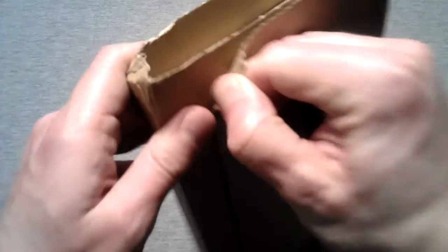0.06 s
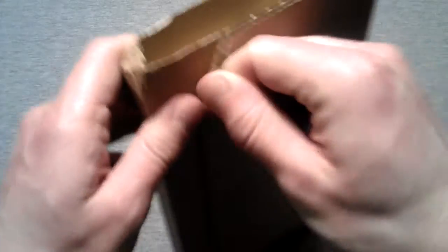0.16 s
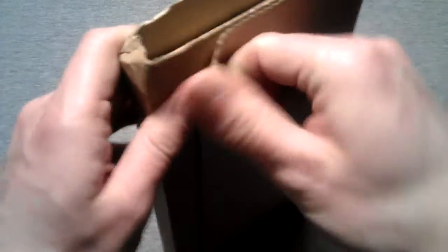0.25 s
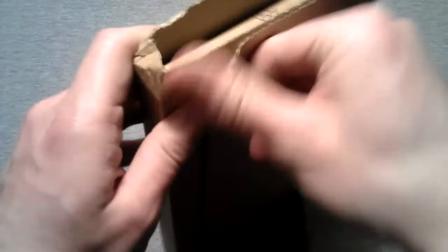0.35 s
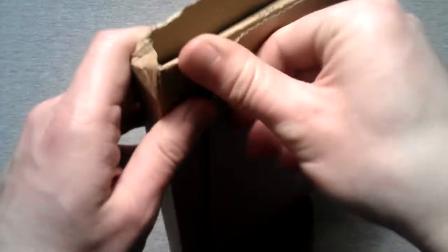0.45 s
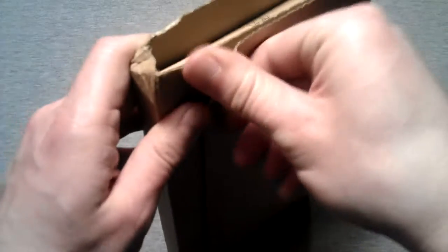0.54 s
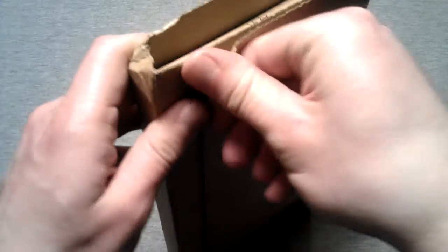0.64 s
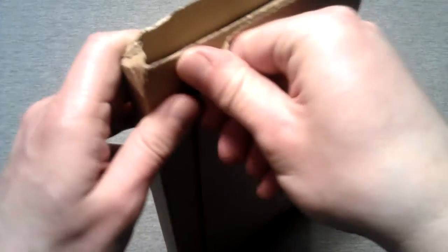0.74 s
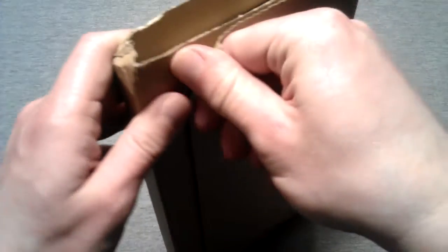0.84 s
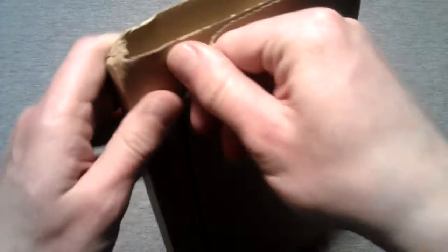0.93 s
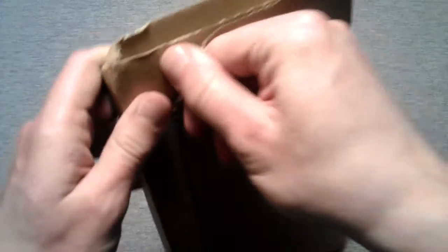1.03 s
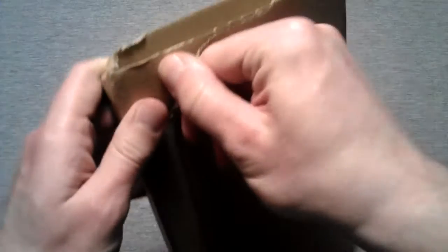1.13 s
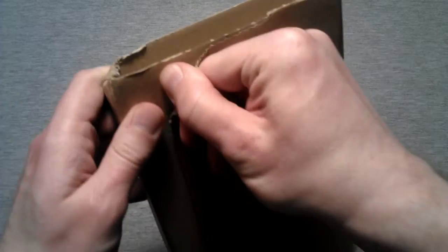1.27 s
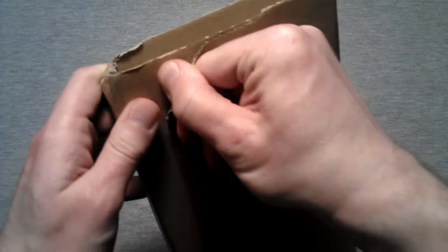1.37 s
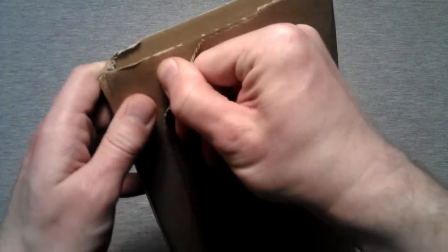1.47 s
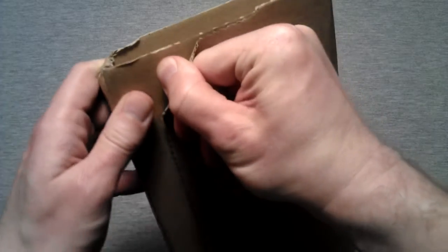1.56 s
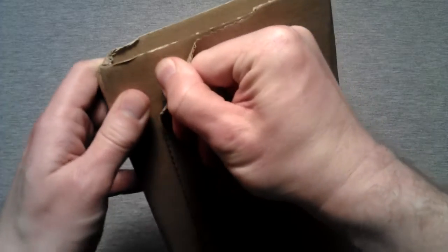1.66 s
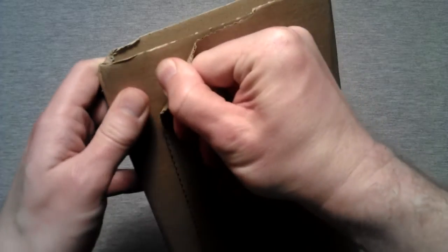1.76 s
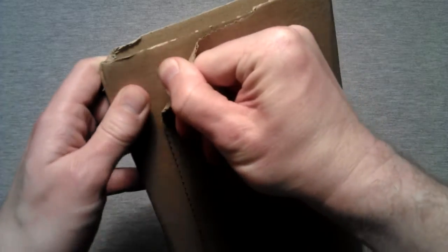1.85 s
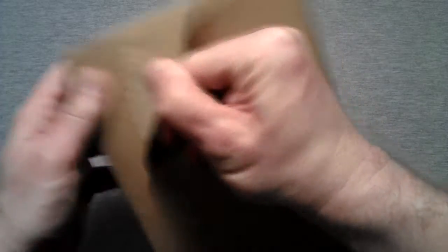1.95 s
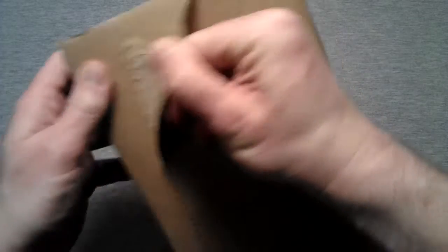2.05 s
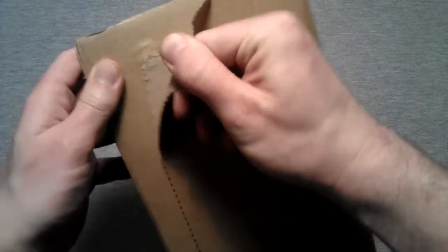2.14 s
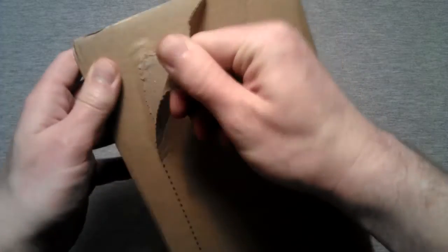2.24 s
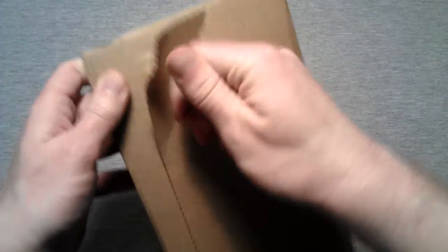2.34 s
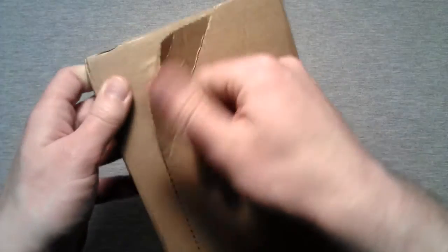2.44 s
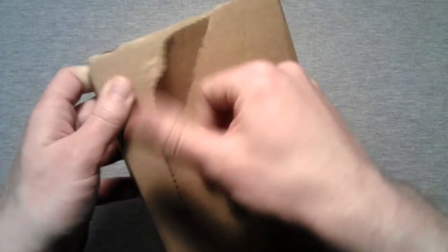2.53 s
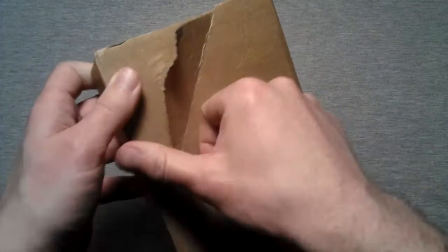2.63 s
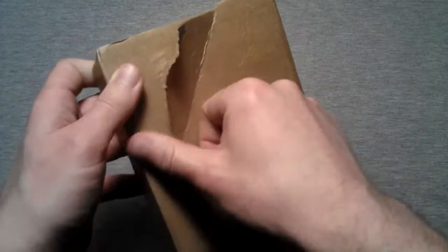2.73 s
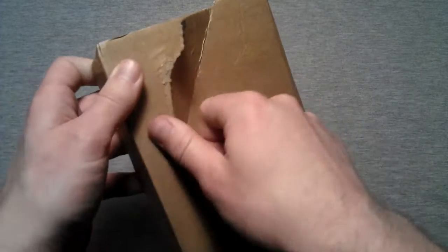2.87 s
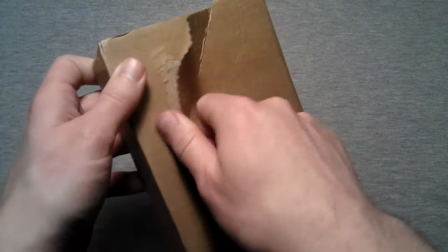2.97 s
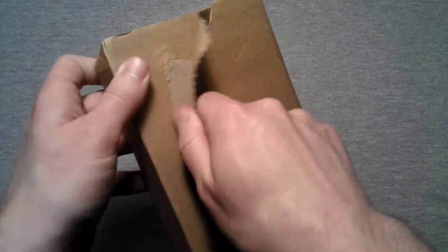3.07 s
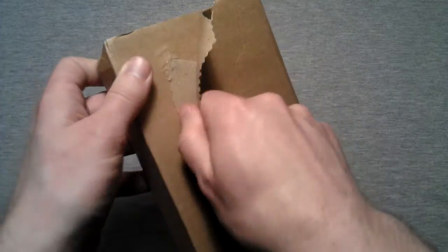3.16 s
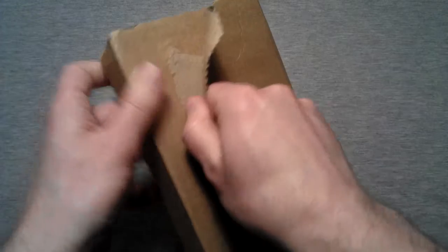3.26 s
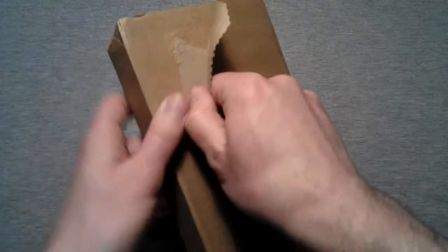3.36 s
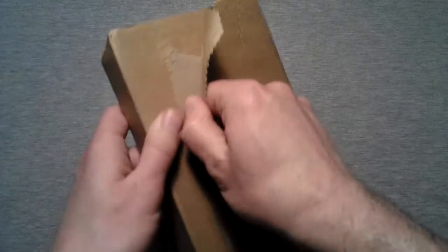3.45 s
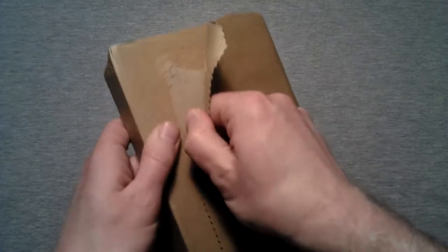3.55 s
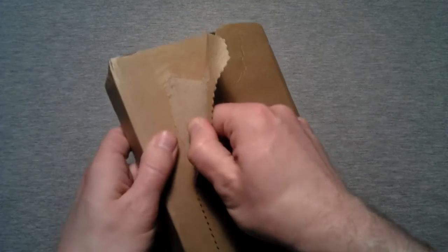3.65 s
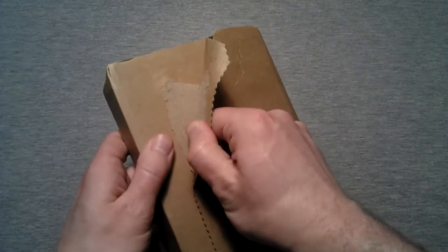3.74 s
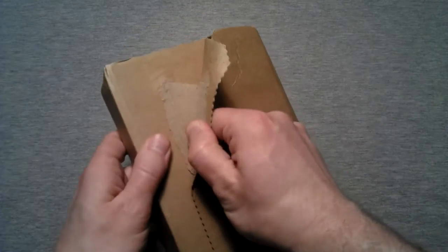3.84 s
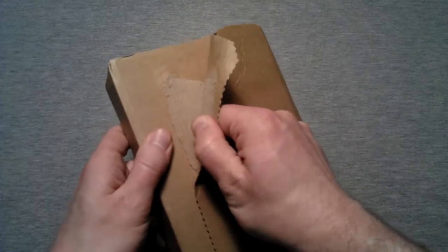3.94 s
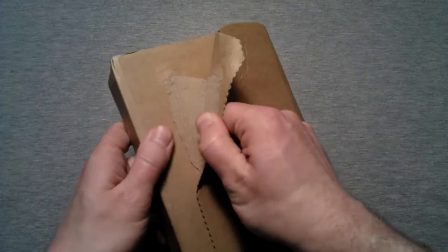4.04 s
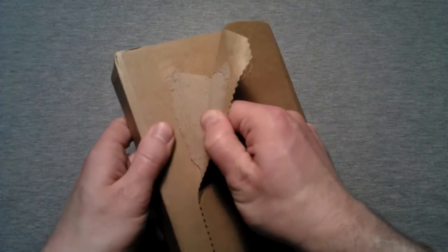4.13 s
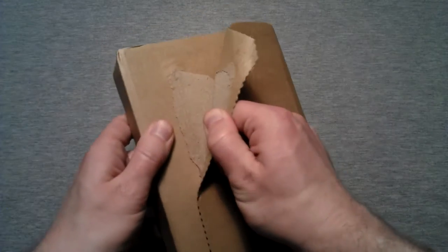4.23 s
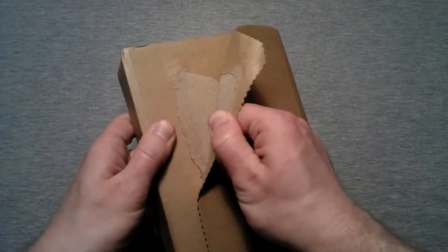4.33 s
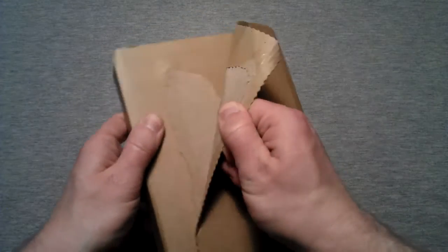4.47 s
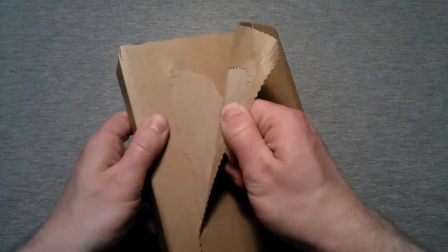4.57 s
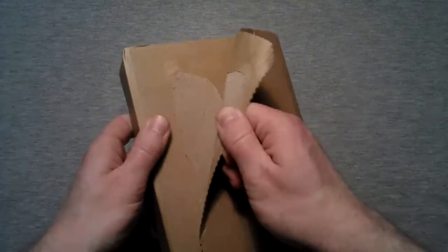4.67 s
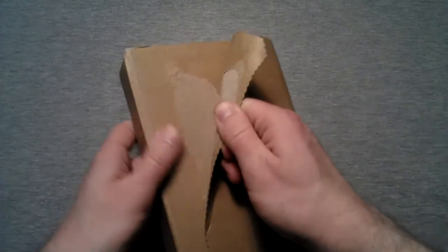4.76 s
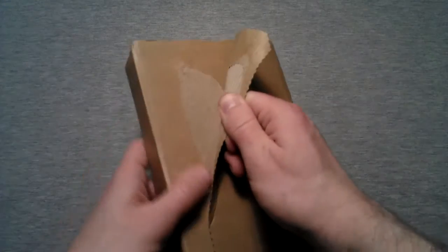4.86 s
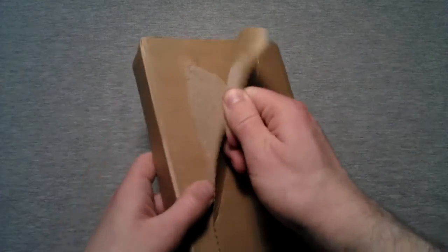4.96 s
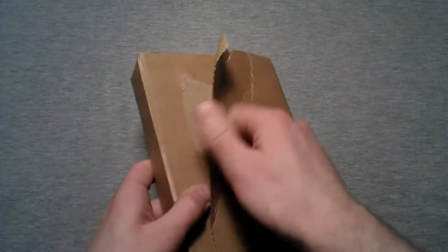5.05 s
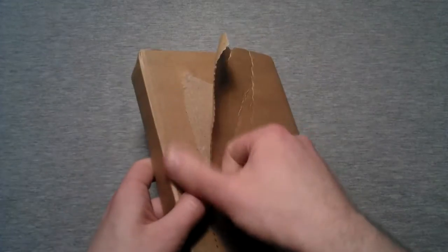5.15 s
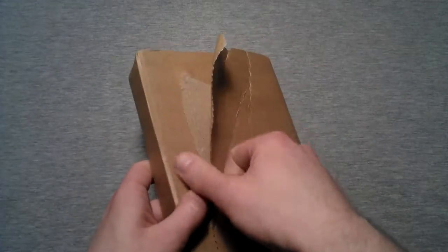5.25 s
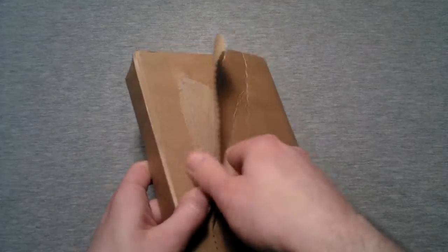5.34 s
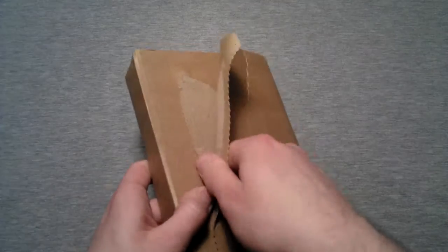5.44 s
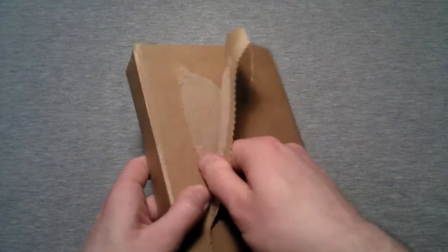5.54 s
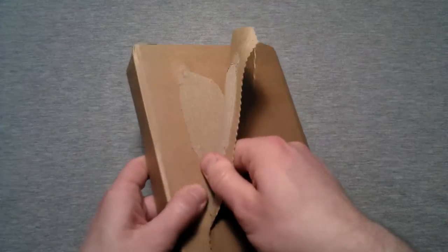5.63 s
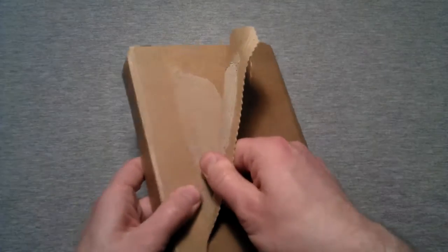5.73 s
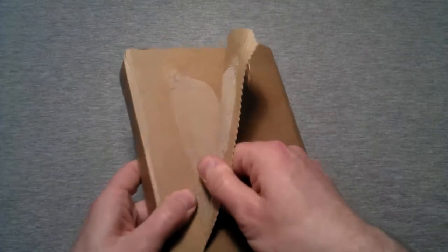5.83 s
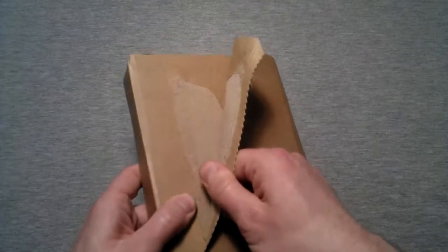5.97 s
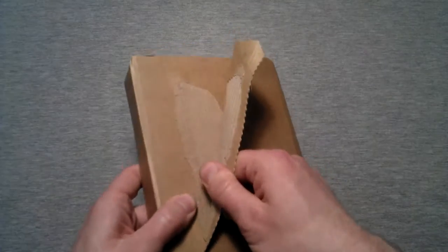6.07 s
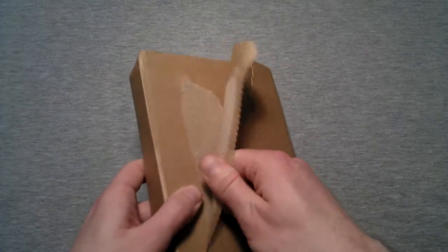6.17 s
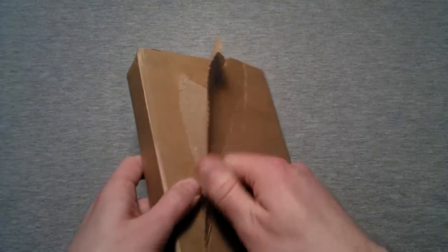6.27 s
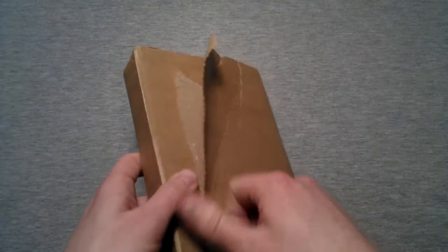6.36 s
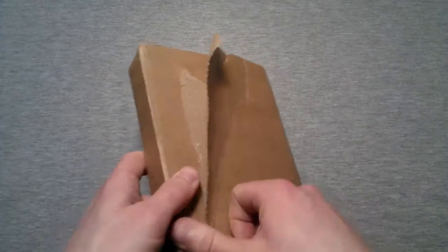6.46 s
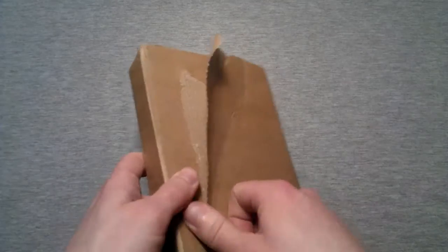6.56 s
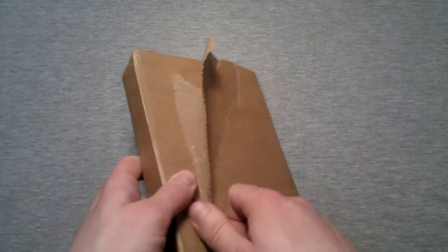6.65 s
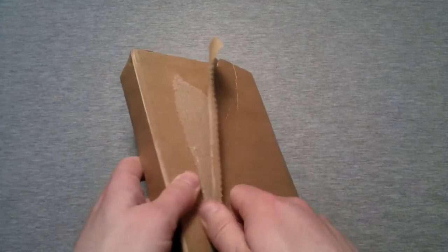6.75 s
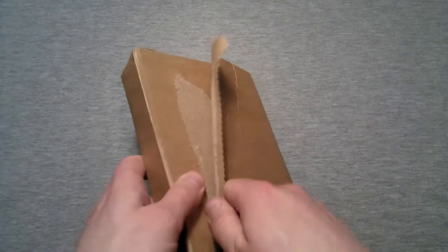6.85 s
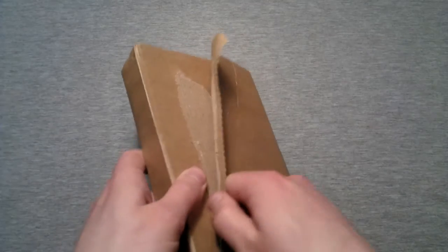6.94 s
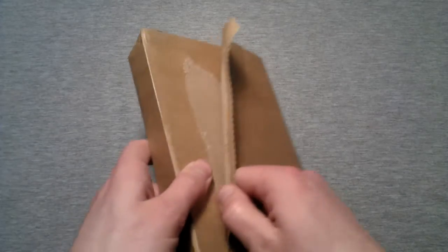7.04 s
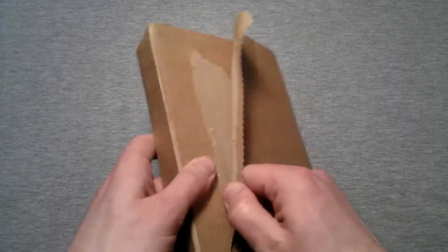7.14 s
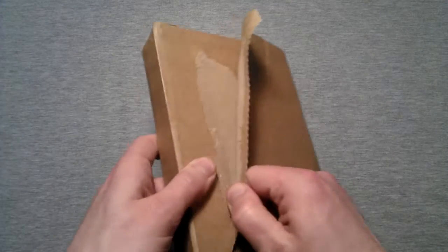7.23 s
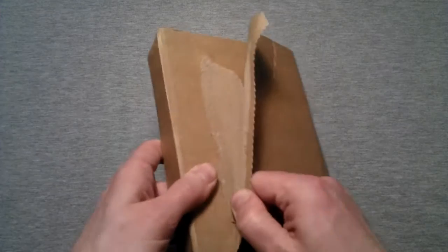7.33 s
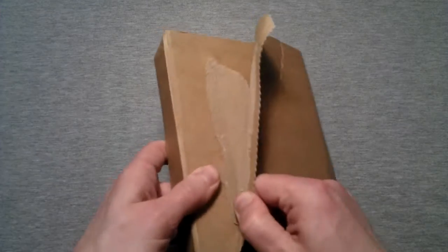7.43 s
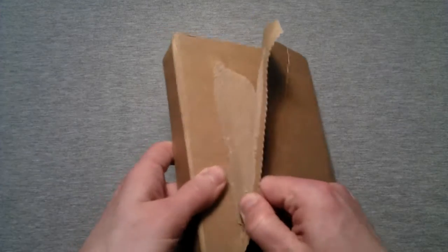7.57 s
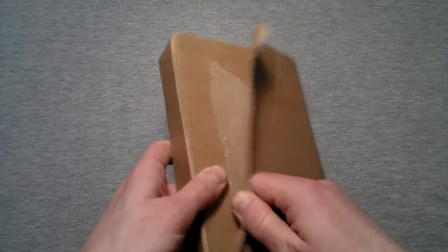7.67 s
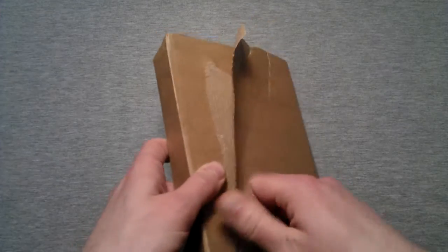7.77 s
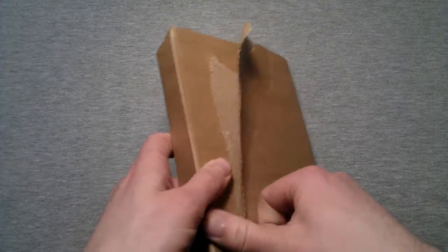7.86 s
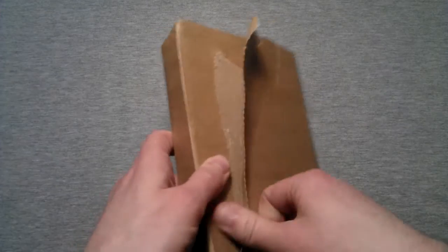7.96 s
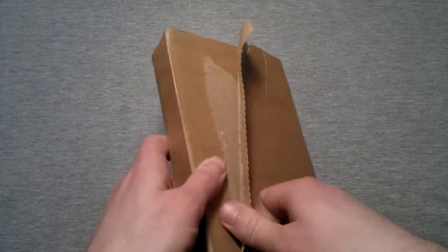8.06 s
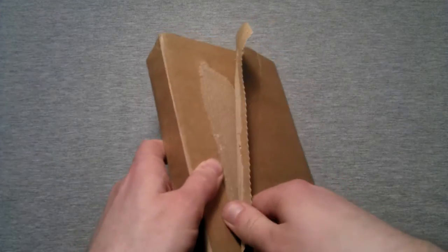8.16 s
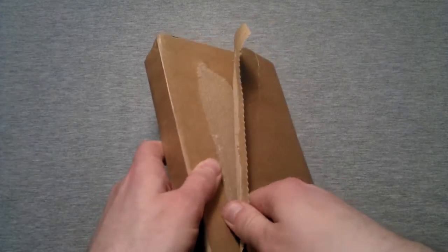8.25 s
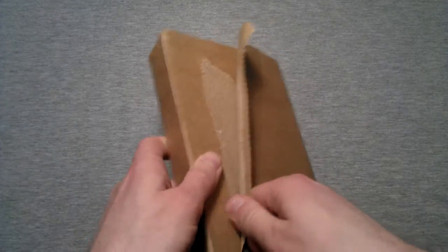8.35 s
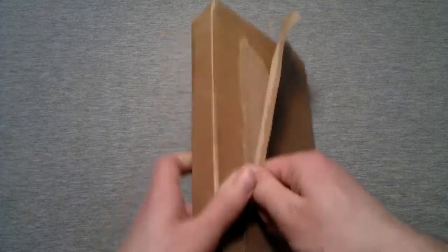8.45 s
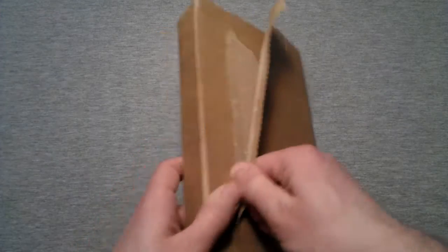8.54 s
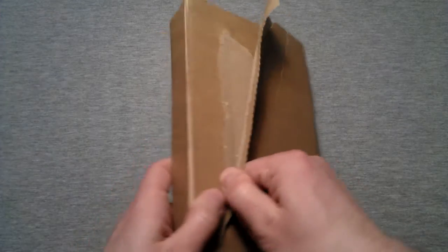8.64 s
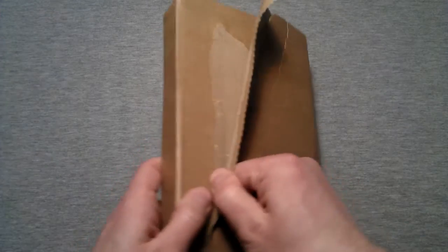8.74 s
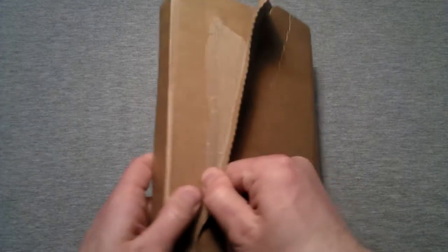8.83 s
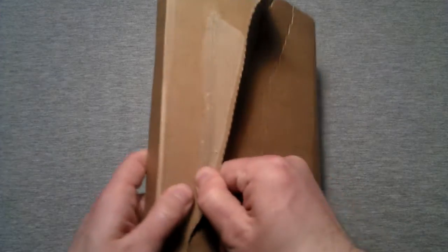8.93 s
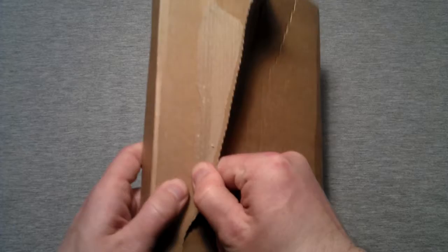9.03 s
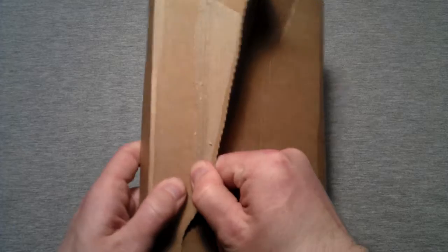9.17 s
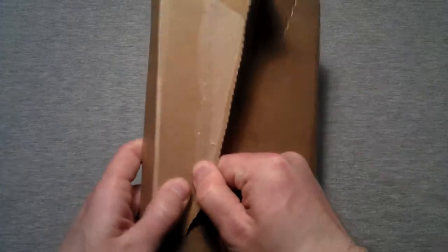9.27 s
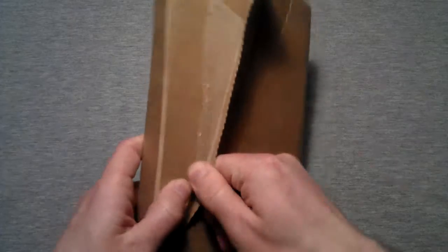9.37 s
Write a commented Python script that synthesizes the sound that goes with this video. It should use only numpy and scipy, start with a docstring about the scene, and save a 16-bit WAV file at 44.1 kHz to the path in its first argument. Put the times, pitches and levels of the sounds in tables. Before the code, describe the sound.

Close to a small microphone in a quiet furnished room, hands hold a corrugated cardboard parcel over a faint hush. Tiny ticks and soft skin rustle come first; from 0.8 to 1.45 s a thumb judders over the panel in rapid dull chirps, slowing, then quickening. After one tick at 1.6 s, a violent short rip at 2.0 s booms through the box, with a knock and a stiff pop at 2.3 s. Quiet fumbling follows until crackles and a snap around 3.65 s. From 4.03 to 4.55 s comes the longest tear: dense bright snaps, thumps and a final fast rip, slightly saturated. A taut creak and sharp pop sound near 5.05 s, brief cracks at 5.83 s, a squeaky creak at 6.3 s. Light slips lead into tearing at 7.15-7.6 s, a scrape at 7.8 s, juddering strip slips at 8.2-8.8 s, and last crackling snaps at 8.95-9.15 s, then soft handling.

```python
"""A small, quiet furnished room: two hands open a corrugated cardboard mailer close to a small microphone.
They slide over the liner and a thumb judders over the panel, each slip a falling chirp; then the tear
strip is pulled in stages. Fibres crackle as random grains, perforation bridges snap and thump the box,
slips make the strip creak, rips are dense noise. The loudest peaks saturate the microphone."""
import sys
import numpy as np
from scipy import signal
from scipy.fft import rfft, irfft
from scipy.io import wavfile
from scipy.ndimage import map_coordinates

SR = 44100
rng = np.random.default_rng(int(sys.argv[2]) if len(sys.argv) > 2 else 0)


def int16_out(signal):
    """Quantize to a 16-bit WAV file."""
    q = np.round(np.clip(np.atleast_2d(signal).T, -1, 1) * 32767)
    wavfile.write(sys.argv[1], SR, q.astype(np.int16))


N = 414540
TIME = np.arange(N) / SR
TOP_HZ = 16000  # upper limit of the microphone

# fast rips, where the tear runs free: (time [s], length [s], level [dB], box boom [dB])
RIP_TIMES = [(1.992, 0.027, -6, -8.5), (2.031, 0.033, -6, -17), (4.489, 0.03, -10, -22.5),
             (4.517, 0.028, -6, -36), (5.047, 0.016, -22, -45), (5.825, 0.017, -17.5, -38),
             (5.862, 0.014, -11.5, -50.5), (6.328, 0.012, -24.5, -27), (7.35, 0.0063, -17, -19)]
# what a snapping bridge or bundle radiates: (frequency [Hz], level [dB])
SNAP_SPECTRUM = [(100, -40), (400, -11.5), (900, 4), (1600, 15), (3000, 10.5), (4800, 10.5), (8000, 2),
                 (11500, 0.5), (16000, -25.5)]
# thin bridges and bundles tick brighter than thick ones: (crack peak [dB], treble tilt [dB per octave])
THINNESS_TILT = [(-18.5, 4.4), (3.5, 0.71)]
BRIGHT_HZ = 4030  # that tilt acts above this
# what the wide panel radiates: (frequency [Hz], level [dB])
PANEL_SPECTRUM = [(120, -50), (210, -31.5), (330, 1.5), (570, 3.5), (950, -2), (1600, 1), (2300, -3),
                  (3500, 1), (6000, -3), (10000, -16.5), (16000, -54.5)]
# what the narrow tear strip radiates at tension 1: (frequency [Hz], level [dB])
STRIP_SPECTRUM = [(120, -43), (350, -5.5), (700, -1.5), (1020, -2), (1310, 10.5), (1570, 5), (1880, 11),
                  (2400, -1), (3200, -6), (5000, -13.5), (8000, -29.5), (16000, -53.5)]
# what skin sliding on the liner radiates: (frequency [Hz], level [dB])
SKIN_SPECTRUM = [(120, -37), (350, -20.5), (900, -6), (1700, 6), (2600, 3.5), (4500, 3.5), (6000, -5),
                 (9000, -19.5), (16000, -39)]
# what the whole box radiates: (frequency [Hz], level [dB])
BOX_SPECTRUM = [(25, -31.5), (90, -18), (170, -4), (270, 4.5), (420, 2), (700, -0.5), (1500, -11),
                (6000, -59)]
SOFT_HZ = 1320  # the softness of the contact tilts the treble above this


def undb(db):
    """Decibels to gain."""
    return 10 ** (np.asarray(db) / 20)


def unit(x):
    """Scale to rms 1."""
    return x / np.sqrt(np.mean(x ** 2))


def add(track, s, sound):
    """Mix a sound into a track at a time in seconds."""
    i = max(int(s * SR), 0)
    track[i:i + len(sound)] += sound[:N - i]


def through(x, response):
    """Pass a sound through an impulse response."""
    return signal.fftconvolve(x, response)[:len(x)]


def tilted(points, db_per_octave, corner_hz):
    """A spectrum with its treble tilted above a corner."""
    return [(hz, db + db_per_octave * np.log2(max(hz / corner_hz, 1))) for hz, db in points]


def board(points, lag_s=0, size=2048):
    """Causal response of a spectrum; bending waves are dispersive, so the bass comes later than the treble."""
    f = np.arange(size // 2 + 1) * SR / size
    hz, db = np.transpose(points)
    gain = undb(np.interp(np.log(f + 1), np.log(hz), db))
    # folding the cepstrum gives minimum phase
    cepstrum = irfft(np.log(gain))
    cepstrum[1:size // 2] *= 2
    cepstrum[size // 2 + 1:] = 0
    # delay of f: lag_s * (sqrt(1000 / f) - sqrt(1000 / TOP_HZ))
    turns = lag_s * (2 * np.sqrt(1000 * f) - f * np.sqrt(1000 / TOP_HZ))
    return irfft(np.exp(rfft(cepstrum) - 2j * np.pi * turns))


def walk(rate):
    """Random wander through rate random values a second, with a spread near 1."""
    knots = rng.standard_normal(N // 20)
    return np.interp(TIME * rate, np.arange(len(knots)), knots)


def grains(rate, spread_db):
    """Random clicks, rate a second, scaled to rms 1: many small, a few large."""
    chance, size, sign = rng.random(N), rng.exponential(size=N), rng.choice([-1, 1], N)
    clicks = (chance < rate / SR) * sign * undb(spread_db * np.minimum(size, 3))
    return unit(clicks / np.sqrt(rate))  # even power where the rate varies


def blow(response, path, scatter, ring_s):
    """One click, followed by its scattering among flutes and edges; peak 1."""
    fading = np.exp(-TIME[:len(path)] / ring_s)
    force = scatter * path * fading / np.sqrt(ring_s * SR / 2)
    force[0] += 1
    sound = through(force, response)
    return sound / np.abs(sound).max()


def paths(rows, hold_s, size=3072):
    """A scattering pattern for each event; it changes only as the contact moves, over about hold_s."""
    out = rng.standard_normal((len(rows), size))
    for k in range(1, len(rows)):
        alike = np.exp(-abs(rows[k][0] - rows[k - 1][0]) / hold_s)
        out[k] = alike * out[k - 1] + np.sqrt(1 - alike ** 2) * out[k]
    return out


def scattered(response, count, scatter, ring_s):
    """Responses from several spots on the board, each with its own colour and the same energy."""
    spots = [blow(response, rng.standard_normal(2048), scatter, ring_s) for _ in range(count)]
    return [unit(spot) for spot in spots]


def strokes(rows, rise_s, fall_s, swell=0):
    """Envelope of short pulls (s, length, dB) that build up, hold and run out; swell slows the long ones."""
    out, t = np.zeros(N), TIME[:SR // 2]
    for s, length, db in rows:
        rise = 1 - np.exp(-t / (rise_s + swell * length))
        fall = np.exp(-np.maximum(t - length, 0) / fall_s)
        add(out, s, undb(db) * rise * fall)
    return out


def stick_slip(curve):
    """Skin sticks and lets go, a little unevenly, at the rate of a curve (s, slips per s, dB, ..)."""
    jitter_s, scatter_db = .0005, 1.5
    times, rates, levels, *others = np.transpose(curve)
    rows, s = [], times[0]
    for late, louder in rng.standard_normal((64, 2)):  # at most 64 slips
        if s < times[-1]:
            db = np.interp(s, times, levels) + scatter_db * louder
            rows.append((s + jitter_s * late, db, *(np.interp(s, times, column) for column in others)))
            s += 1 / np.interp(s, times, rates)
    return rows


def pull():
    """Strength of the slow tearing through time, as a gain."""
    # one curve for each pull: (time [s], fibre crackle [dB])
    pull_curves = [
        [(1.35, -48.5), (1.66, -54.5), (1.81, -50.5), (1.87, -60.5), (1.979, -39.5), (1.99, -13)],
        [(3.6, -50.5), (3.67, -41), (3.695, -32), (3.725, -48.5), (3.82, -53.5)],
        [(4.022, -52), (4.055, -32.5), (4.15, -23.5), (4.235, -36.5), (4.255, -24), (4.36, -33), (4.43, -36.5),
         (4.49, -21)],
        [(5.68, -59), (5.812, -45.5), (5.825, -22), (5.88, -41), (5.96, -55), (6.01, -46), (6.06, -55)],
        [(7.17, -29.5), (7.27, -35), (7.3, -27), (7.4, -27.5), (7.44, -50), (7.6, -44.5), (7.7, -59)],
        [(8.945, -50), (8.965, -33.5), (9.05, -39.5), (9.11, -31), (9.14, -30), (9.2, -47.5), (9.27, -73)],
    ]
    force = np.zeros(N)
    for curve in pull_curves:
        times, levels = np.transpose(curve)
        force += np.interp(TIME, times, undb(levels), left=0, right=0)
    return force


def background(sound, loud_db=-11, depth_db=8, recover_s=0.1):
    """The hush of the room and a faint rustle of the grip; both dip at a loud sound and then come back."""
    # hush of the room: (frequency [Hz], level [dB])
    air_spectrum = [(30, -42), (75, -37.5), (160, -25), (290, -9), (600, -8.5), (1100, -14.5),
                    (1700, -13.5), (3600, -27), (7000, -24.5), (16000, -32)]
    air_db, grip_db, grip_wander_db = -57.5, -61, 3  # the grip: hands that merely hold the parcel
    hush = undb(air_db) * unit(through(rng.standard_normal(N), board(air_spectrum)))
    rustle = unit(through(grains(rate=2600, spread_db=3), board(SKIN_SPECTRUM)))
    grip = undb(grip_db + grip_wander_db * walk(7.2)) * rustle
    # peak level that falls away with time constant recover_s
    fading = TIME / recover_s
    held = np.exp(np.maximum.accumulate(np.log(np.abs(sound) + 1e-9) + fading) - fading)
    dip = held ** 2 / (held ** 2 + undb(loud_db) ** 2)
    return (hush + grip) * undb(-depth_db * dip)


def sliding():
    """Hands, peeling strip and freed flaps slide with a grainy hiss; its colour shifts with the contact."""
    # strokes of the hands over the liner:
    # (time [s], length [s], level [dB], sharp edge hiss against that level [dB])
    hand_strokes = [(0, 0.032, -63, 15), (0.23, 0.012, -46.5, 12.5), (0.457, 0.038, -62.5, 14),
                    (0.615, 0.16, -57, -1.5), (0.793, 0.47, -46, -26), (1.333, 0.091, -54, -15),
                    (1.676, 0.13, -57, 8.5), (2.111, 0.033, -35.5, -26), (2.468, 0.011, -53.5, 4.5),
                    (3.347, 0.075, -50.5, -27), (3.555, 0.042, -53, 10.5), (3.747, 0.021, -49.5, 8),
                    (2.585, 0.0085, -62, -12), (3.96, 0.021, -43.5, -4.5), (4.857, 0.19, -46, -7.5),
                    (5.278, 0.024, -50.5, -10), (6, 0.005, -36, -31), (6.236, 0.06, -46, -22),
                    (6.651, 0.014, -40, -16.5), (6.888, 0.064, -32.5, -22), (6.984, 0.09, -47.5, -12),
                    (7.801, 0.028, -24, -2.5), (8.018, 0.027, -39, -24), (8.18, 0.18, -44, -10),
                    (8.464, 0.23, -49, -5), (8.539, 0.054, -44.5, 12), (9.133, 0.082, -43.5, -2)]
    edge_hz, edge_q = 11000, 1  # hiss of a paper edge under the fingers
    peel_db = -12.5  # the peeling strip rubs on the liner: level against the crackle
    # after each rip the freed flap slides on: level against the rip, time at speed, decay
    flap_db, flap_s, flap_fall_s = -16.5, 0.039, 0.022

    spots = scattered(board(SKIN_SPECTRUM), count=4, scatter=0.59, ring_s=0.00051)
    shares = np.array([undb(6.8 * walk(18)) for _ in spots])
    shares /= np.sqrt(np.sum(shares ** 2, axis=0))
    hiss = np.zeros(N)
    for share, spot in zip(shares, spots):
        hiss += share * through(grains(rate=5700, spread_db=1.0), spot)
    hiss = unit(hiss * undb(0.75 * walk(44)))
    edge = unit(signal.lfilter(*signal.iirpeak(edge_hz, edge_q, fs=SR), hiss))

    skin_rows = [(s, length, db) for s, length, db, _ in hand_strokes]
    edge_rows = [(s, length, db + sharp) for s, length, db, sharp in hand_strokes]
    flap_rows = [(s + length, flap_s, db + flap_db) for s, length, db, _ in RIP_TIMES]
    skin = strokes(skin_rows, rise_s=0.004, fall_s=0.017, swell=0.096)
    edges = strokes(edge_rows, rise_s=0.0037, fall_s=0.012, swell=0.11)
    flaps = strokes(flap_rows, rise_s=.004, fall_s=flap_fall_s)
    return (skin + flaps + undb(peel_db) * pull()) * hiss + edges * edge


def ticks():
    """Bundles of fibres part with a short, dry tick, the thinner the brighter."""
    # bundles that part without shaking the box: (time [s], peak level [dB])
    tick_times = [(0.031, -34), (0.238, -30.5), (1.6223, -19), (1.985, -13), (2.233, -39.5), (3.575, -28),
                  (3.627, -26.5), (3.659, -15), (3.7017, -15), (4.043, -12), (4.0576, -6), (4.0801, -6),
                  (4.1025, -12), (4.1288, -13), (4.19, -6), (4.2155, -15), (4.22, -15), (4.2625, -4.5),
                  (4.269, -9), (4.295, -4.5), (4.3089, -3), (4.3321, -7), (4.345, -4.5), (4.383, -12.5),
                  (4.3888, -6.5), (4.398, -3), (4.441, -17), (4.4618, -12), (5.723, -31), (5.857, -7.5),
                  (7.148, -26.5), (7.212, -19), (7.2222, -10.5), (7.2739, -15.5), (7.3283, -3.5),
                  (7.4546, -11.5), (7.5131, -17), (7.583, -18.5), (7.605, -19.5), (7.815, -13.5),
                  (8.8605, -23), (8.951, -24), (8.9585, -18.5), (8.966, -7.5), (8.997, -14), (9.02, -14.5),
                  (9.067, -14.5), (9.085, -17.5), (9.092, -16), (9.1366, -9.5), (9.144, -10.5)]
    out = np.zeros(N)
    for (s, db), path in zip(tick_times, paths(tick_times, hold_s=0.012)):
        tilt = np.interp(db, *np.transpose(THINNESS_TILT))
        tick = board(tilted(SNAP_SPECTRUM, tilt, BRIGHT_HZ), lag_s=.0006)
        add(out, s, undb(db) * blow(tick, path, scatter=1.6, ring_s=.0016))
    return out


def knocks():
    """Dull knocks on the box wall, some soft, the loudest during the first rip."""
    # knocks on the wall: (time [s], peak level [dB])
    knock_times = [(.43, -44), (1.844, -42.5), (2.048, -5), (2.072, -14), (2.301, -18), (3.256, -41.5),
                   (6.078, -44), (7.812, -31), (8.424, -25.5)]
    # what the knocked wall radiates: (frequency [Hz], level [dB])
    spectrum = [(40, -22.5), (130, -26.0), (300, 2.0), (600, 4.5), (1500, -24.0), (6000, -52.5)]
    out, wall = np.zeros(N), board(spectrum, lag_s=0.002)
    for (s, db), path in zip(knock_times, paths(knock_times, hold_s=0.02)):
        add(out, s, undb(db) * blow(wall, path, scatter=0.16, ring_s=0.0065))
    return out


def thumb():
    """Each slip sends a falling chirp over the panel, duller if soft; a resonance follows the thumb."""
    # one curve for each push: (time [s], slip rate [1/s], peak level [dB],
    # treble tilt [dB per octave], resonance under the thumb [Hz])
    pushes = [
        [(.805, 79, -34, 0.5, 350), (.89, 82, -34, -3.5, 380), (.94, 67, -21.5, 0.5, 447),
         (.982, 115, -27, -2.5, 600), (1.044, 73, -18.5, -2.5, 620)],
        [(1.358, 105, -21, -3.5, 705), (1.39, 118, -23.5, -1.5, 900), (1.442, 120, -32.5, -11, 1010)],
    ]
    # single slips, which spread out as the first push slows, then quicken into the second:
    # (time [s], peak level [dB])
    single_slips = [(1.052, -19), (1.067, -20), (1.086, -19.5), (1.111, -20), (1.129, -19.5), (1.155, -20),
                    (1.189, -18.5), (1.211, -18.5), (1.236, -20), (1.277, -24.5), (1.302, -24),
                    (1.32, -26.5), (1.334, -24), (1.348, -24.5)]
    single_tilt, single_spot_hz = -2, 1740  # tilt in dB per octave and resonance of those single slips
    spot_db, spot_octaves = 4, 0.39  # height and width of the resonance under the thumb

    slips = [slip for push in pushes for slip in stick_slip(push)]
    slips = sorted(slips + [(s, db, single_tilt, single_spot_hz) for s, db in single_slips])
    out, hz = np.zeros(N), np.geomspace(120, TOP_HZ, 64)
    panel_hz, panel_db = np.transpose(PANEL_SPECTRUM)
    plain = np.interp(np.log(hz), np.log(panel_hz), panel_db)
    for (s, db, tilt, spot_hz), path in zip(slips, paths(slips, hold_s=0.071)):
        spot = spot_db * np.exp(-(np.log2(hz / spot_hz) / spot_octaves) ** 2)
        panel = board(tilted(zip(hz, plain + spot), tilt, SOFT_HZ), lag_s=0.0021)
        chirp = blow(panel, path, scatter=1.3, ring_s=.004)
        add(out, s, undb(db) * chirp)
    return out


def crackle():
    """Fine fibres part one by one, each at its own spot; a harder pull breaks more of them a second."""
    # what the fibres radiate: (frequency [Hz], level [dB])
    fibre_spectrum = [(100, -34), (400, -32), (850, -24), (1600, -2), (2800, 4.5), (4500, 5), (8000, -1.5),
                      (11500, -2.5), (16000, -16)]
    catch_db, catch_per_s = 2.2, 90  # the slow tear catches and lets go again
    force = pull()
    rate = 35 + 60 * np.sqrt(force / force.max())
    out = np.zeros(N)
    for spot in scattered(board(fibre_spectrum, lag_s=.0005), count=6, scatter=1.3, ring_s=0.0022):
        fibres = grains(rate, spread_db=4) + .6 * grains(rate=900, spread_db=1)
        out += through(fibres * undb(2.0 * walk(47)), spot)
    return force * undb(catch_db * walk(catch_per_s)) * unit(out)


def rips():
    """A running tear: a dense, uneven stream of breaks that also shakes the whole box."""
    # what the running tear radiates: (frequency [Hz], level [dB])
    rip_spectrum = [(100, -28), (500, -8.5), (900, -8.5), (1600, -2), (2500, -4), (5000, -7), (8000, -15.5),
                    (11500, -13), (16000, -23)]
    fibres = grains(rate=5400, spread_db=2.0) * undb(0.5 * walk(300))
    tear_rows = [(s, length, db) for s, length, db, _ in RIP_TIMES]
    boom_rows = [(s, length, boom_db) for s, length, _, boom_db in RIP_TIMES]
    tear = unit(through(fibres, board(rip_spectrum, lag_s=.0007)))
    boom = unit(through(fibres, board(BOX_SPECTRUM)))
    tear = tear * strokes(tear_rows, rise_s=0.00057, fall_s=0.012)
    boom = boom * strokes(boom_rows, rise_s=0.0024, fall_s=0.0078)
    return tear + boom


def lurch():
    """When the first rip lets go, the whole panel lurches with a deep bump."""
    deep = signal.butter(2, [20, 125], "band", fs=SR, output="sos")
    rumble = signal.sosfilt(deep, rng.standard_normal(N))
    return unit(rumble) * strokes([(1.996, 0.014, -17)], rise_s=0.0013, fall_s=0.0019)


def snaps():
    """Each bridge cracks, the thinner the brighter; the sudden release thumps the box wall."""
    # perforation bridges that snap: (time [s], crack peak [dB], box thump peak [dB])
    snap_times = [(1.9961, -5.5, -0.5), (3.6756, -6, -8), (4.0693, 2, -29), (4.0765, -0.5, -41.5),
                  (4.134, 5.5, -28.5), (4.1416, 1.5, -33), (4.246, 5, -3.5), (4.3149, -1, -50),
                  (4.4735, 1.5, -4), (4.5, 1.5, -2.5), (5.819, 1, -49), (5.8265, 3, -22), (5.8644, 8, -50),
                  (6.3309, -1, -32), (7.168, -4, -1), (7.2922, 1.5, -19.5), (7.3524, 1, -6.5),
                  (7.3812, -2.5, -26), (9.1005, -2, -49), (9.124, 3, -6.5)]
    out, wall = np.zeros(N), board(BOX_SPECTRUM, lag_s=.0007)
    for (s, db, thump_db), path in zip(snap_times, paths(snap_times, hold_s=0.031)):
        tilt = np.interp(db, *np.transpose(THINNESS_TILT))
        crack = board(tilted(SNAP_SPECTRUM, tilt, BRIGHT_HZ), lag_s=.0008)
        add(out, s, undb(db) * blow(crack, path, scatter=1.8, ring_s=0.0029))
        add(out, s, undb(thump_db) * blow(wall, path, scatter=.15, ring_s=.003))
    return out


def creaks(slip_hz=620, bass_cut_hz=750):
    """Fast, uneven runs of slips; the strip rings higher the tauter it is, wavers, and gives little bass."""
    # slips so fast that they merge: (time [s], length [s], level [dB],
    # tension [factor on the strip's resonances])
    creak_times = [(2.284, 0.029, -27, 1.06), (2.871, 0.021, -30.5, 1.1), (4.773, 0.082, -37.5, 1.08),
                   (4.989, 0.069, -27, 1.17), (5.034, 0.024, -15, 1.2), (5.067, 0.0092, -12, 1.38),
                   (6.248, 0.13, -28, 1.27), (6.324, 0.01, -7, 1), (6.334, 0.0096, -9, 1.41),
                   (8.617, 0.03, -26, 1.1), (9.196, 0.018, -31.5, 1.07)]
    waver, waver_per_s = .07, 110  # the tension wavers: share, changes per s
    cycles = np.floor(np.cumsum(slip_hz * np.exp(0.51 * walk(200))) / SR)
    slips = unit(np.diff(cycles, prepend=0))  # a click at each whole cycle
    train = (slips + .7 * rng.standard_normal(N)) * undb(2.5 * walk(200))
    train = signal.sosfilt(signal.butter(2, bass_cut_hz, "high", fs=SR, output="sos"), train)
    wavering = np.cumsum(1 + waver * walk(waver_per_s))  # uneven reading position, in samples
    out = np.zeros(N)
    for s, length, db, tension in creak_times:
        ring = through(train, board([(tension * hz, gain) for hz, gain in STRIP_SPECTRUM]))
        ring = map_coordinates(ring, [wavering], order=1, mode="mirror")
        out += unit(ring) * strokes([(s, length, db)], rise_s=.001, fall_s=0.004, swell=0.12)
    return out


def strip(panel_db=-13):
    """Slips, alone or in a run, ring the narrow strip, higher when taut; the panel it hangs from answers."""
    # single slips of the fingers on the stiff strip: (time [s], peak level [dB],
    # tension [factor on its resonances], treble tilt [dB per octave])
    finger_slips = [(2.293, -3, 0.96, -1), (2.2975, -5.5, 1.14, 5.5), (2.482, -34.5, 0.83, 3),
                    (2.618, -34, 0.86, 0.5), (2.88, -21.5, 0.82, 11), (2.944, -45, 0.68, 5),
                    (3.418, -29.5, 1.34, 1), (4.993, -19.5, 0.92, 4.5), (5.0785, 0, 1.82, -2.5),
                    (5.081, -11.5, 0.69, -4), (6.29, -12.5, 1.4, -3.5), (6.3135, -9.5, 1.33, 3.5),
                    (6.662, -21.5, 1.24, -0.5), (6.958, -15, 1.05, 4), (6.989, -14.5, 0.94, 5),
                    (7.006, -14.5, 1.07, 0.5), (7.033, -17.5, 0.8, 8), (7.056, -20, 0.99, 7),
                    (7.813, -16, 0.65, 5), (8.196, -22, 1.08, -2), (8.296, -18, 0.92, 4),
                    (8.311, -15.5, 0.98, 4.5), (8.338, -19, 0.85, 6.5), (8.3715, -15.5, 0.89, 4),
                    (8.405, -14, 0.93, -3), (8.416, -15, 1.07, 3), (8.4245, -9, 1.13, -7),
                    (8.437, -10.5, 1.06, -10), (8.611, 0.5, 1.04, 1.5), (8.6305, -2, 1.03, -2.5),
                    (8.818, -25.5, 1.14, -5)]
    # a run of slips: (time [s], slip rate [1/s], peak level [dB], tension [factor],
    # treble tilt [dB per octave])
    judder = [(8.714, 82, -14.5, 1.08, -3), (8.75, 95, -13, 1.1, -5), (8.797, 92, -22, 1.12, -4)]
    taut_db = -56  # the taut strip passes less on to the panel: dB per unit of tension above 1

    out, panel = np.zeros(N), board(PANEL_SPECTRUM, lag_s=0.002217)
    slips = sorted(map(tuple, list(finger_slips) + stick_slip(judder)))
    for (s, db, tension, tilt), path in zip(slips, paths(slips, hold_s=0.098)):
        tightened = [(tension * hz, gain) for hz, gain in STRIP_SPECTRUM]
        ring = board(tilted(tightened, tilt, SOFT_HZ), lag_s=0.001049)
        add(out, s, undb(db) * blow(ring, path, scatter=.8, ring_s=.003))
        answer_db = db + panel_db + taut_db * max(tension - 1, 0)
        add(out, s, undb(answer_db) * blow(panel, path[::-1], scatter=.5, ring_s=.006))
    return out


def pops():
    """The bent wall pops back and its modes die away."""
    # the wall pops back: (time [s], level [dB], tension [factor on its modes])
    pop_times = [(2.298, -24, 1), (5.079, -37.5, 1.7)]
    # what it rings with: (frequency [Hz], level [dB], time to fall 60 dB [s])
    pop_modes = [(344, -11.5, 0.23), (1560, -8.5, .11), (1775, -6, .07), (1780, -3.5, .07)]
    out, t = np.zeros(N), TIME[:SR // 4]
    for s, db, tension in pop_times:
        for hz, gain, t60 in pop_modes:
            mode = np.sin(2 * np.pi * tension * hz * t) * np.exp(-np.log(1000) * t / t60)
            add(out, s, undb(db + gain) * mode)
    return out


def walls(x):
    """The box walls ring along with whatever happens in the board."""
    # stiff resonances common to every sound in the board: (frequency [Hz], width [Hz], boost [dB])
    wall_modes = [(1448, 8.9, 0.5), (1660, 49, 1.5), (2180, 7.3, 0.5), (3620, 28, 6.5)]
    out = x.copy()
    for hz, width, db in wall_modes:
        out += (undb(db) - 1) * signal.lfilter(*signal.iirpeak(hz, hz / width, fs=SR), x)
    return out


def room(x, wet_db, t60_s, treble_t60_s):
    """A small furnished room: reflections from a few milliseconds on, treble and body dying separately."""
    t = TIME[:SR // 2]
    noise = rng.standard_normal(len(t))
    body = signal.sosfilt(signal.butter(2, [300, 5000], "band", fs=SR, output="sos"), noise)
    treble = signal.sosfilt(signal.butter(2, 6000, "high", fs=SR, output="sos"), noise)
    tail = body * 1000 ** (-t / t60_s) + treble * 1000 ** (-t / treble_t60_s)
    tail *= np.clip(t / 0.003 - .5, 0, 1)
    return x + undb(wet_db) * through(x, tail / np.sqrt(np.sum(tail ** 2)))


def scene():
    """The parcel in its room, over a faint hush."""
    tearing = snaps() + ticks() + crackle() + rips() + lurch()
    handling = thumb() + strip() + creaks() + pops() + sliding() + knocks()
    parcel = room(walls(tearing + handling), wet_db=-16.5, t60_s=0.14, treble_t60_s=0.18)
    return (parcel + background(parcel))[None]


def record(dry, notch_hz=7100, notch_q=2.7, depth=.65, lopsided=0.006):
    """The microphone dulls a treble band; loud peaks saturate, unevenly by a low bump; the top is cut."""
    ceiling = .75  # amplitude that the saturation approaches
    top = signal.ellip(10, .1, 60, TOP_HZ, fs=SR, output="sos")
    notched = signal.lfilter(*signal.iirnotch(notch_hz, notch_q, fs=SR), dry)
    dulled = dry + depth * (notched - dry)
    driven = np.tanh(signal.sosfilt(top, dulled) / ceiling)
    low = signal.butter(1, [25, 250], "band", fs=SR, output="sos")
    bump = signal.sosfilt(low, driven ** 2)
    return signal.sosfiltfilt(top, ceiling * driven + lopsided * bump)


dry = scene()
out = record(dry)
int16_out(out)
```